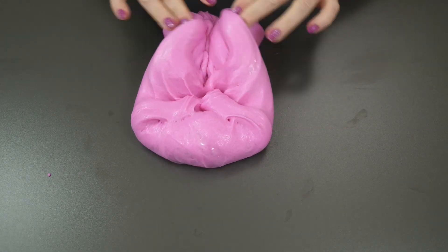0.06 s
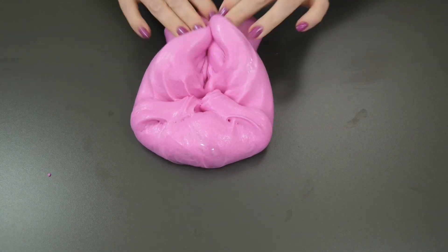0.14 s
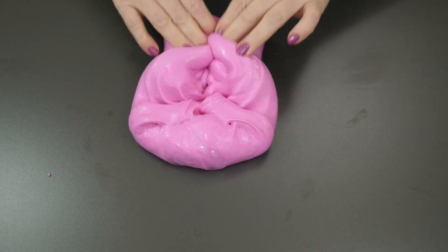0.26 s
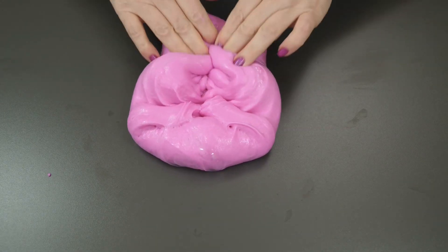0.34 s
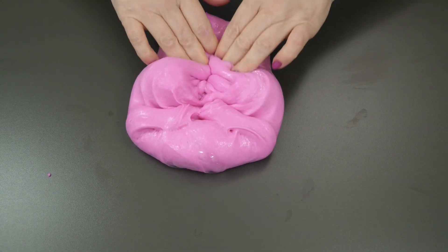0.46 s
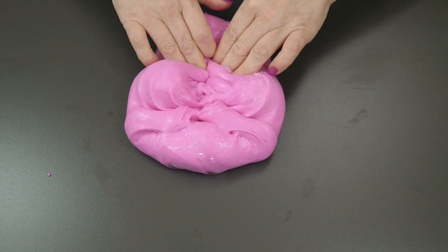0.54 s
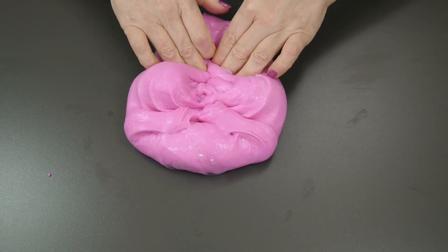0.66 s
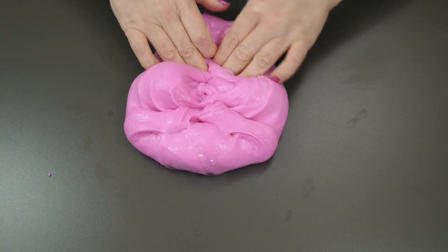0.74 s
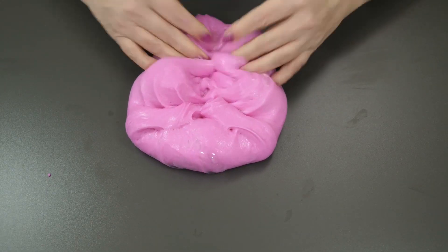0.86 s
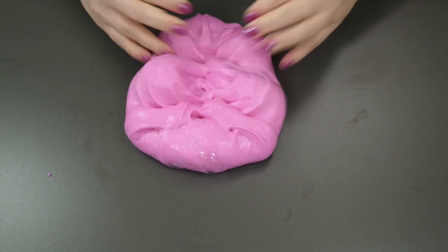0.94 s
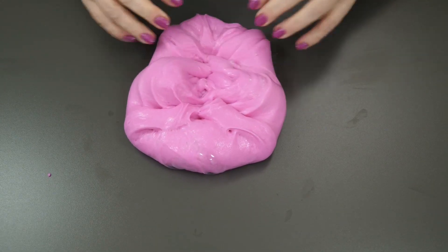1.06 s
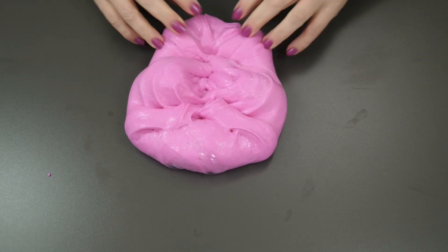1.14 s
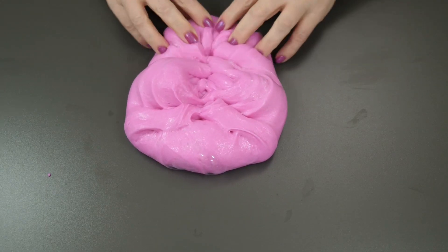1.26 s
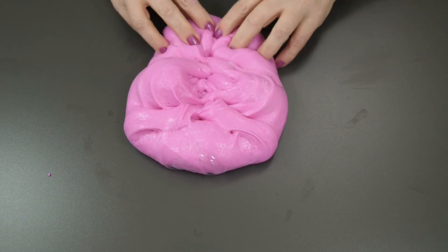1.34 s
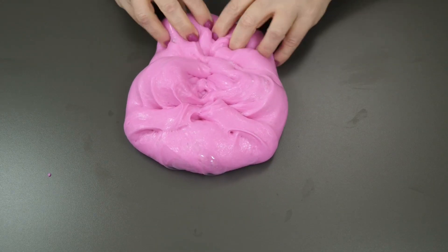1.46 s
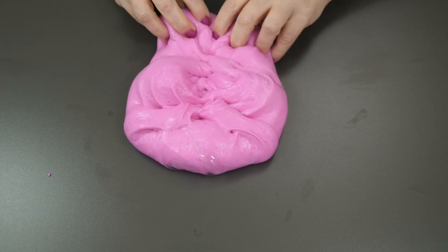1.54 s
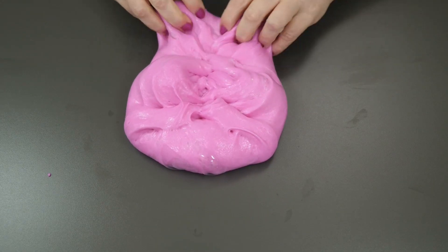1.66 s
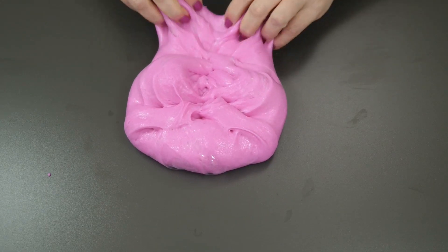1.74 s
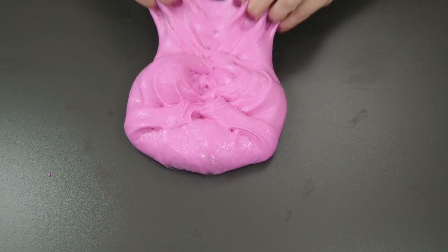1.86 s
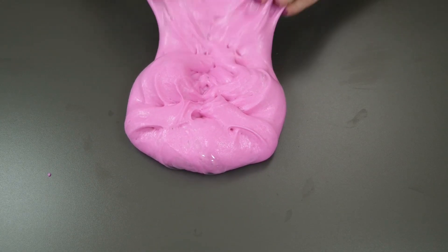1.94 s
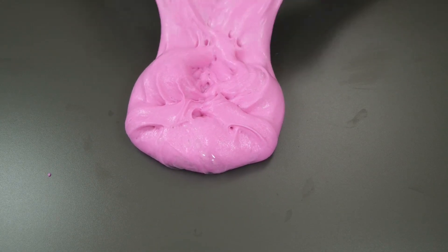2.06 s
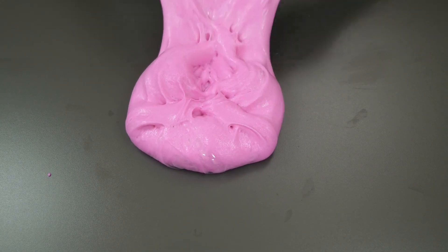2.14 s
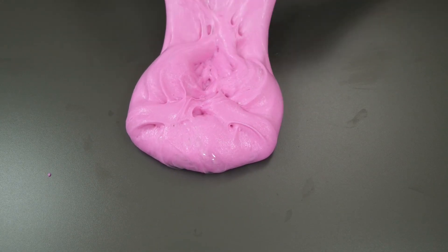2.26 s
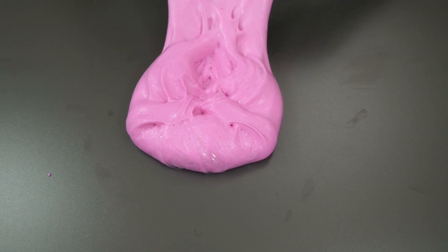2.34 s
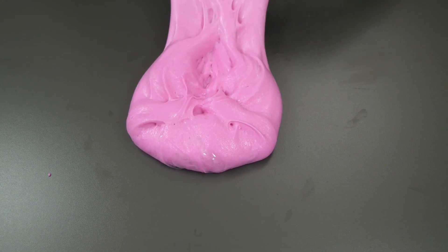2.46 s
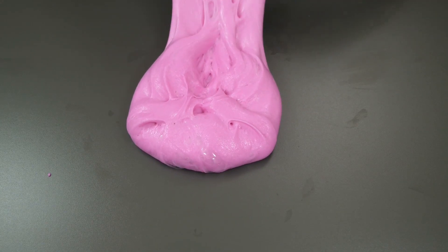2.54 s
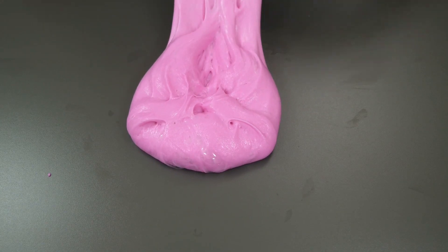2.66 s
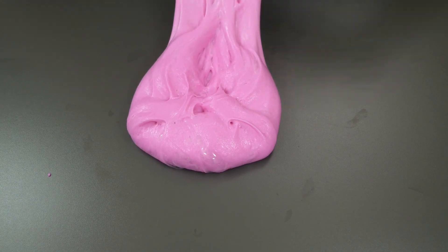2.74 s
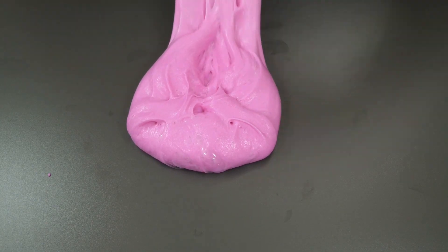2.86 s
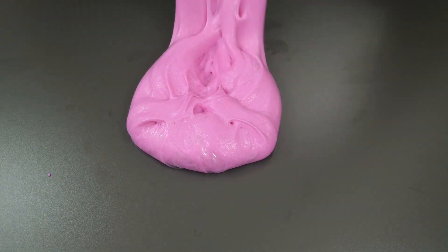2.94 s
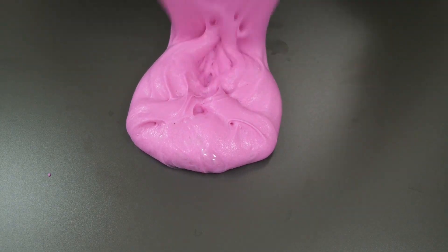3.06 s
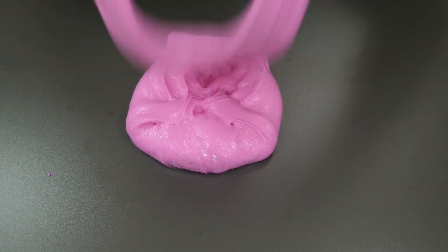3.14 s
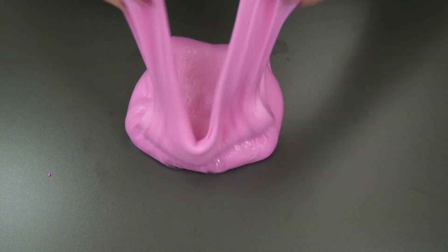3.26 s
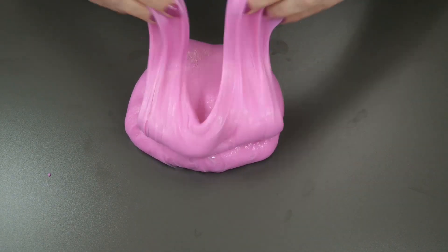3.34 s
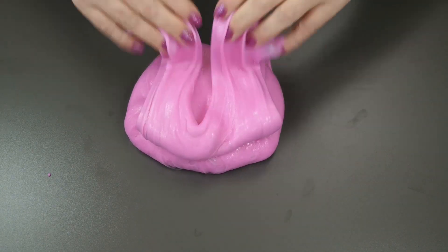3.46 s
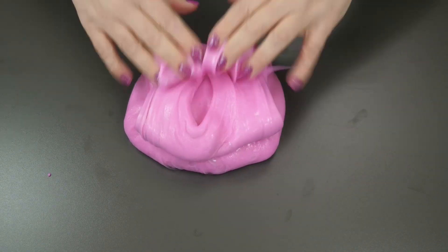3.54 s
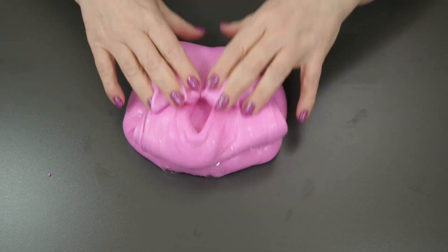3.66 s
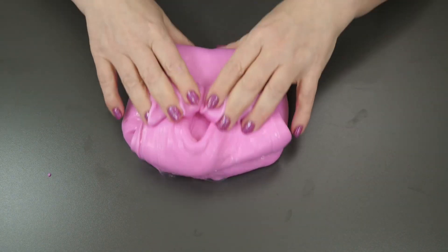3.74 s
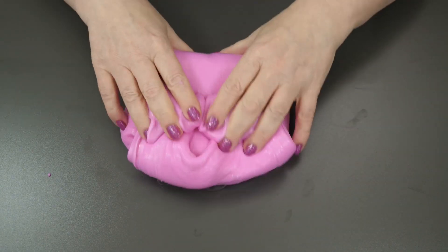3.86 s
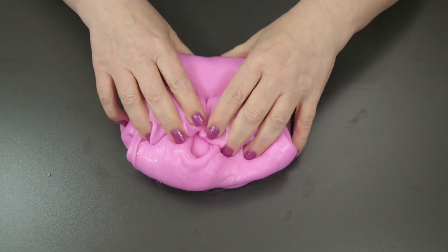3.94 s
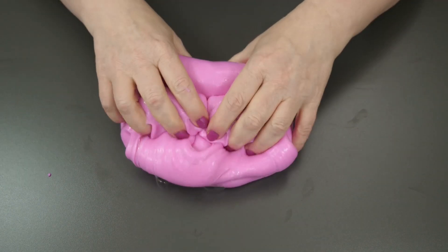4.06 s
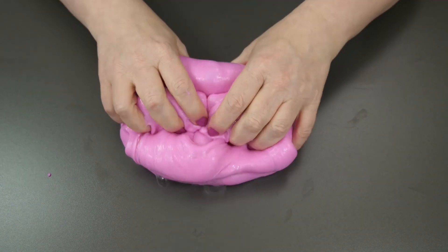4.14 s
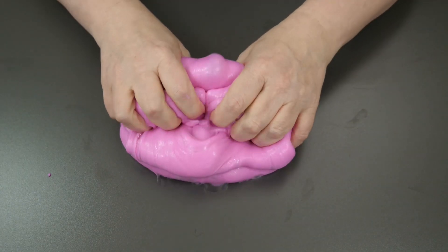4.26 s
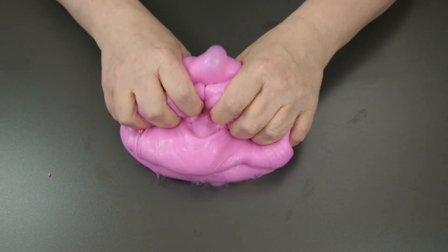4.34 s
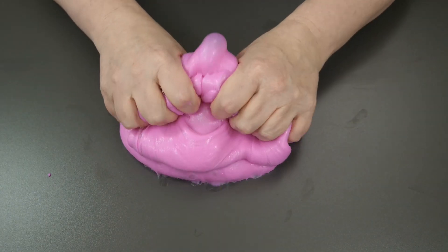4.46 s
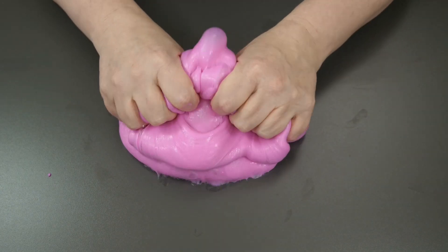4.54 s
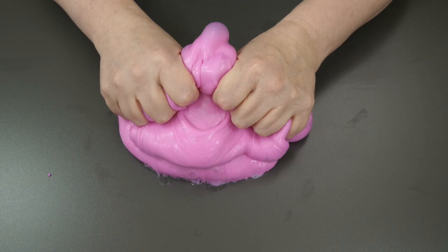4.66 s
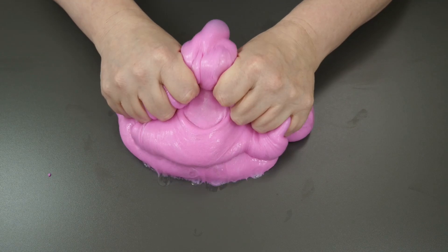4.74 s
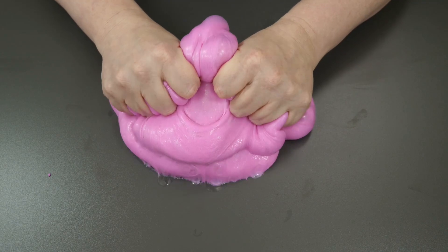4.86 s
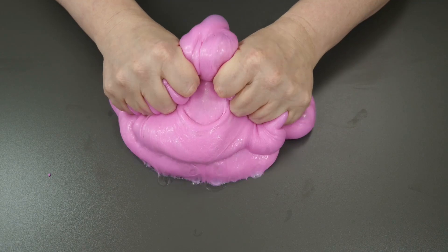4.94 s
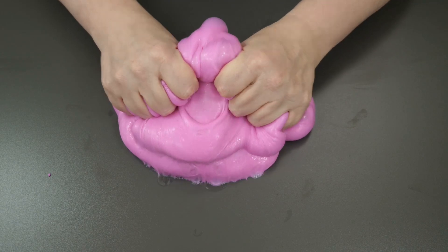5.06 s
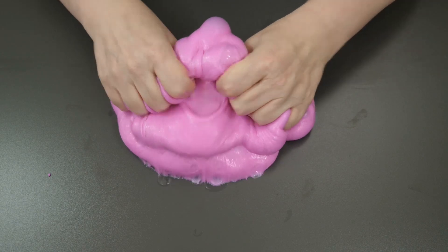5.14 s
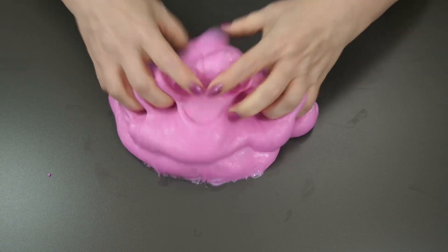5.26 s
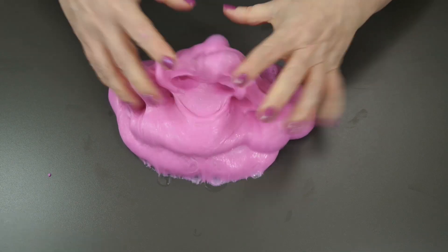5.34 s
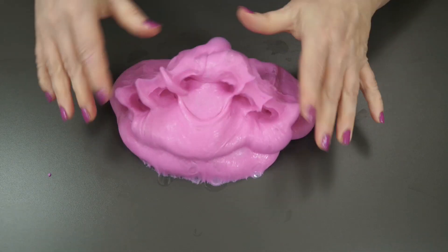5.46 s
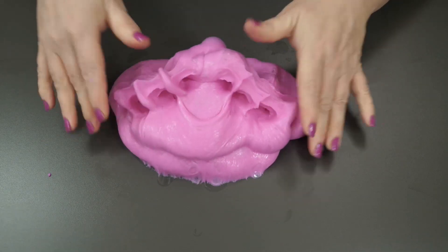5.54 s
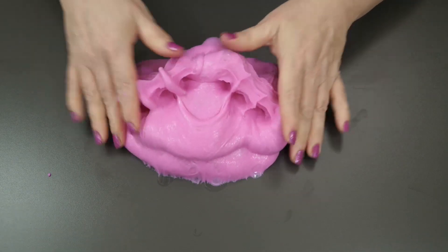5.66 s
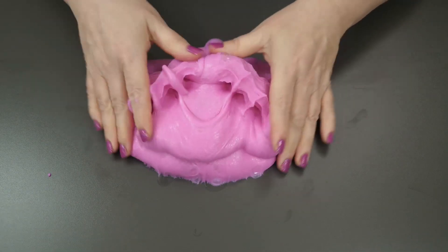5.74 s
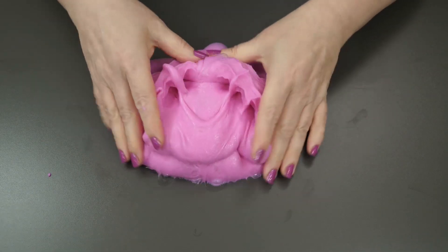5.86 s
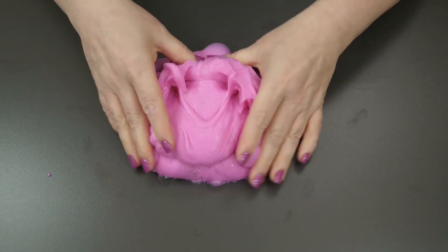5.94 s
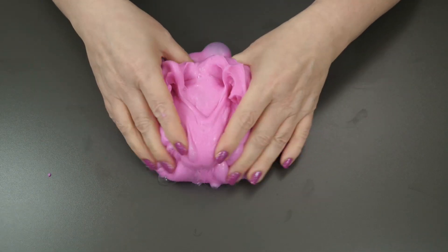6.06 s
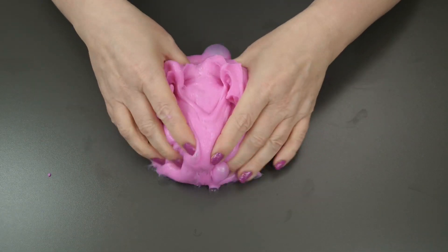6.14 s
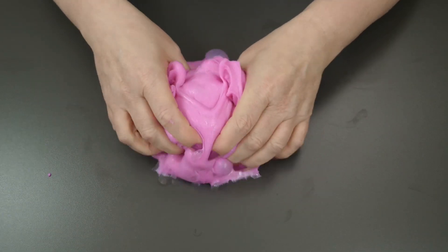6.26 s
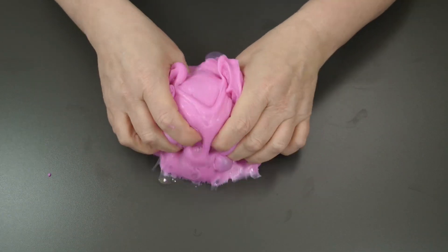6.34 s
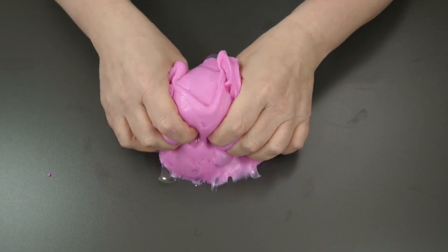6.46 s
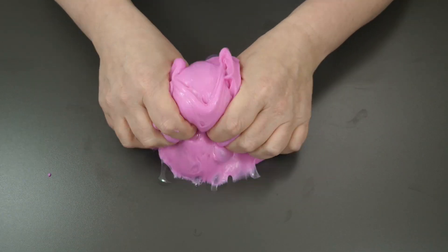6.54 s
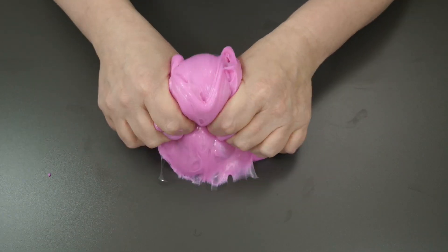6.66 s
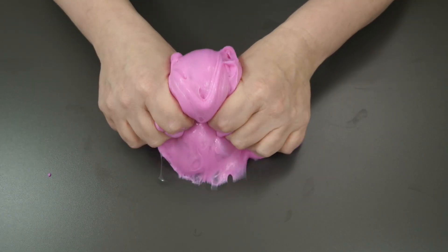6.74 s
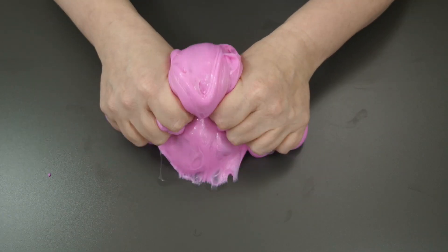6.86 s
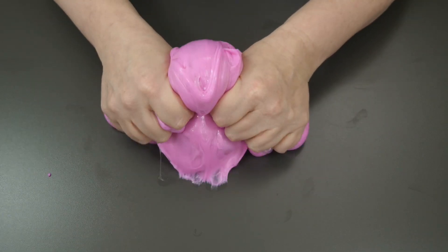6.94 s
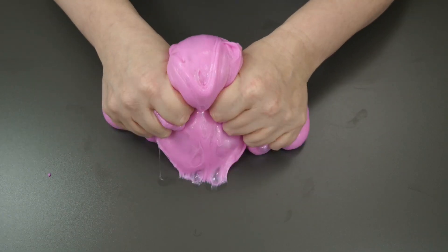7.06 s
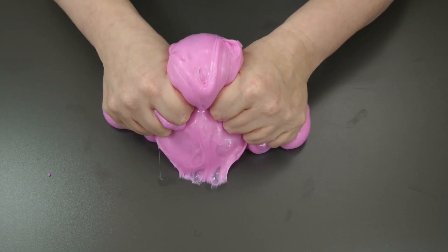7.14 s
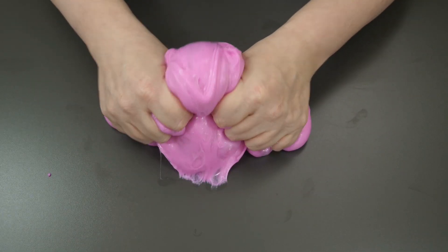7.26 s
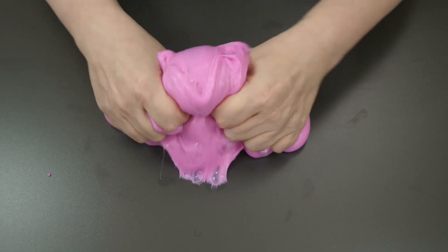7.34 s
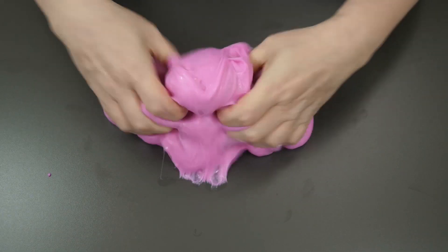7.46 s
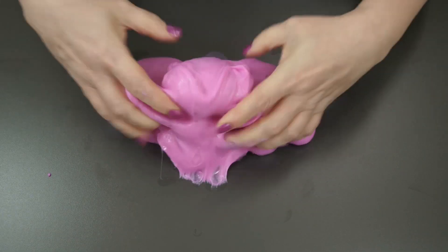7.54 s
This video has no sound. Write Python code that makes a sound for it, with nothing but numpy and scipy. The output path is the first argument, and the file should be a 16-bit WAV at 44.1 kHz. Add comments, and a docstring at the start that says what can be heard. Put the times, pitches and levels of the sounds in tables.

```python
"""At a table in a small room, two hands fold, stretch and squeeze foamy slime near a stereo microphone.
Trapped air bursts out in sharp pops, sticky skin tears off the fingers in dense crackle, and a stretched
strand flops back down. Each pop bounces off the table top and rings briefly in the room; the loudest
ones overload the recorder. Underneath, the table rumbles as the arms shove it."""
import sys
import numpy as np
from scipy import signal
from scipy.fft import rfft, irfft
from scipy.io import wavfile
from scipy.ndimage import uniform_filter1d

SR = 44100
rng = np.random.default_rng(int(sys.argv[2]) if len(sys.argv) > 2 else 0)


def unload_wav(signal):
    """Save mono or channel-first audio to the path in sys.argv[1] as 16-bit WAV at rate SR, clipped to [-1, 1]."""
    wavfile.write(
        sys.argv[1],
        SR,
        np.round(np.clip(np.atleast_2d(signal).T, -1, 1) * 32767).astype(np.int16),
    )


N = 335160
T = np.arange(N) / SR

# Levels in all tables are relative: the functions add their own gains.
# the hands press, stretch or squeeze the lump: start_s, end_s, smear_db, foam_db
PRESSES = [(0.02, 0.105, -47, -48), (0.294, 0.7, -67, -64), (2.1, 3.15, -75, -65),
           (3.521, 4.404, -54.5, -57), (4.6, 4.658, -40.5, -42), (4.849, 5.08, -59, -47.5),
           (5.75, 5.9, -56.5, -64), (5.98, 6.744, -50.5, -51), (6.98, 7.165, -43, -42),
           (7.389, 7.6, -49.5, -43.5)]
# tone of the tiniest breaking threads and foam cells: frequency_hz, level_db
FIZZ_TONE = [(3500, -36), (6500, -5.5), (10500, -1), (13000, -4), (16000, -11)]


def from_db(db):
    """Turn decibels into a gain."""
    return 10 ** (np.asarray(db) / 20)


def unit_power(x):
    """Scale a sound to an average power of 1."""
    return x / np.sqrt(np.mean(x ** 2) + 1e-20)


def at_hz(points, hz):
    """Read between the rows of a table, on a log-frequency axis."""
    frequency, value = np.transpose(points)
    return np.interp(np.log(np.maximum(hz, 1)), np.log(frequency), value)


def tone_filter(tone, size):
    """A click of energy 1 with this tone, which falls away past both ends of the table."""
    hz = np.maximum(np.arange(size // 2 + 1) * SR / size, 1)
    octaves_outside = np.abs(np.log2(hz / np.clip(hz, tone[0][0], tone[-1][0])))
    gain = from_db(at_hz(tone, hz) - 20 * np.minimum(octaves_outside, 2))
    # minimum phase: pack the energy at the start of the click
    cepstrum = irfft(np.log(gain))
    cepstrum[1:size // 2] *= 2
    cepstrum[size // 2 + 1:] = 0
    click = irfft(np.exp(rfft(cepstrum)))
    return click / np.linalg.norm(click)


def colour(x, tone, size=2048):
    """Give both channels this tone."""
    return signal.oaconvolve(x, tone_filter(tone, size)[None], axes=1)[:, :N]


def stereo_noise(alike, size=N):
    """White noise whose left and right are unrelated (alike=0) up to identical (alike=1)."""
    mid, side = rng.standard_normal((2, size))
    return (np.sqrt(1 + alike) * mid + np.sqrt(1 - alike) * side * [[1], [-1]]) / np.sqrt(2)


def add(out, start_s, sound):
    """Mix a short sound in at a given time."""
    i = max(round(start_s * SR), 0)
    out[:, i:i + sound.shape[-1]] += sound[..., :max(N - i, 0)]


def swell(start_s, end_s, rise_s, fall_s):
    """A gain that climbs 20 dB in rise_s, holds from start_s to end_s, then drops 20 dB per fall_s."""
    away = np.maximum(start_s - T, 0) / rise_s + np.maximum(T - end_s, 0) / fall_s
    return np.where(away < 4, from_db(-20 * away), 0)


def strongest(swells, levels_db):
    """One gain curve per column of levels, set by the strongest movement at each moment."""
    out = np.zeros((len(levels_db[0]), N))
    for gain, db in zip(swells, levels_db):
        out = np.maximum(out, from_db(db)[:, None] * gain)
    return out


def room_hush(level_db=-50):
    """The steady hush of the room."""
    # tone of the hush: frequency_hz, level_db
    hush_tone = [(15, -38), (25, -1.5), (61, -1), (123, -11.5), (223, -12), (301, -13), (344, -14.5),
                 (503, -20), (659, -20.5), (1230, -24), (11000, -31), (14800, -30.5), (16000, -36)]
    return from_db(level_db) * colour(stereo_noise(alike=0.053), hush_tone, size=8192)


def table_rumble(resting_db=-51, gain_db=-0.5):
    """The table rumbles under the arms, more when they shove it."""
    # shoves of the arms: peak_s, rise_s, fall_s, level_db
    shoves = [(0.1, .5, .8, -44), (1.02, 0.21, .17, -33), (1.33, 0.19, 0.38, -38.5),
              (3.3, 0.054, 0.19, -32), (5.31, .12, 0.32, -30.5), (5.7, 0.66, .8, -40.5),
              (6.2, 1.3, 0.43, -36.5), (7.55, 0.33, .3, -35)]
    # tone of the shaking table: frequency_hz, level_db
    rumble_tone = [(12, -30.5), (20, 3), (32, 1), (54, 0), (81, -3), (119, -17), (190, -17.5), (250, -49),
                   (420, -120)]
    swells = [swell(s, s, rise, fall) for s, rise, fall, _ in shoves]
    push, = strongest(swells, [row[3:] for row in shoves])
    shake = from_db(gain_db) * np.hypot(push, from_db(resting_db))
    return shake * colour(stereo_noise(alike=0.93), rumble_tone, size=16384)


def room_echo(t, tail_db=-3, build_s=0.0058, near_db=-7, near_s=0.0026, bands=8):
    """The room's answer to a click: quick bounces off nearby things, then a smooth, fading tail."""
    # tone of the tail: frequency_hz, level_db
    tail_tone = [(100, -11), (220, 4), (450, 1), (1200, 0.5), (4000, 1), (6500, -4), (10500, -3),
                 (16000, -10.5)]
    # time the tail takes to fade by 60 dB: frequency_hz, fade_s
    fade_times = [(150, 0.3), (1000, 0.28), (4000, 0.3), (9000, 0.26), (16000, 0.42)]
    # how alike left and right are: frequency_hz, likeness (0 to 1)
    likeness = [(100, 1), (300, 0.52), (800, 0), (2000, 0.024), (6000, 0.5), (16000, 0)]
    hz = np.maximum(np.arange(len(t) // 2 + 1) * SR / len(t), 1)
    centres = np.geomspace(125, 16000, bands)
    near = np.exp(-t / near_s) * (1 - np.exp(-2 * t / near_s))
    near *= from_db(near_db) / np.linalg.norm(near)
    spectrum = 0
    for centre, pick in zip(centres, np.eye(bands)):
        tail = from_db(-60 * t / at_hz(fade_times, centre)) * (1 - np.exp(-t / build_s))
        tail *= from_db(tail_db + at_hz(tail_tone, centre)) / np.linalg.norm(tail)
        band = np.sqrt(np.interp(np.log(hz), np.log(centres), pick))
        noise = stereo_noise(at_hz(likeness, centre), size=len(t))
        spectrum = spectrum + band * rfft((near + tail) * noise)
    fade_out = np.minimum(1, 2 * (1 - t / t[-1]))
    return irfft(spectrum) * fade_out


def table_top(t, echo_s=0.001325, echo_db=-11):
    """The hard top's answer to a click: the click itself, one quick bounce and the table's ringing."""
    # notes the top rings at: pitch_hz, width_hz, level_db
    notes = [(220.6, 14.5, -2), (326.6, 31, -3.5), (590, 19, -10), (936, 58, -11), (1370, 100, -9)]
    answer = np.zeros(len(t))
    for hz, width, db in notes:
        ring = np.exp(-np.pi * width * t) * np.cos(2 * np.pi * hz * t)
        answer += from_db(db) * 2 * np.pi * width / SR * ring
    answer[0] += 1
    answer[round(echo_s * SR)] += from_db(echo_db)
    return answer


def flops(contact_s=0.0025):
    """The soft lump lands and sets the table's low notes ringing."""
    # landings and knocks: start_s, level_db
    landings = [(0.931, -28), (1.005, -28), (3.2751, -24), (4.46, -42), (4.551, -48), (5.319, -34),
                (5.456, -52), (7.477, -40)]
    # the table's low notes: pitch_hz, level_db, fade_s (to fall 60 dB)
    notes = [(39.3, -8.5, 0.5), (81.2, -5, 0.18), (172, -8.5, 0.26), (215.7, -2, 0.18), (312, -9.5, 0.082)]
    t, out = np.arange(SR // 2) / SR, np.zeros((2, N))
    thud = sum(np.sin(2 * np.pi * hz * t) * from_db(db - 60 * t / fade_s) for hz, db, fade_s in notes)
    thud *= 1 - np.exp(-t / contact_s)
    for start_s, db in landings:
        add(out, start_s, from_db(db) * thud)
    return out


def tiny_tears(tone, per_s, spread_db, width_db):
    """Many tiny clicks with this tone, each with a random time, size and side."""
    when, size, sign, side, lag = rng.random((int(per_s * N / SR), 5)).T
    sizes = from_db(spread_db * np.minimum(-np.log(size), 5)) * np.sign(sign - .5)
    pan = from_db(width_db * (2 * side - 1))
    left_at = (when * N).astype(int)
    right_at = np.clip(left_at + (12 * lag - 4).astype(int), 0, N - 1)  # a few samples apart
    clicks = np.array([np.bincount(left_at, sizes * pan, N), np.bincount(right_at, sizes / pan, N)])
    return colour(unit_power(clicks), tone)


def kneading(smear_db=-6.5, foam_db=-4.5, grip_s=0.39, relax_s=0.14):
    """Foam cells break steadily while the lump is stretched or pressed."""
    # tone of smearing slime: frequency_hz, level_db
    smear_tone = [(130, -13), (230, -3.5), (500, -7), (1400, -7.5), (4500, -9), (8000, -17)]
    swells = [swell(start, end, grip_s, relax_s) for start, end, *_ in PRESSES]
    smear_gain, foam_gain = strongest(swells, [row[2:] for row in PRESSES])
    smear = smear_gain * tiny_tears(smear_tone, per_s=1200, spread_db=5.5, width_db=1)
    foam = foam_gain * tiny_tears(FIZZ_TONE, per_s=900, spread_db=1.5, width_db=2.5)
    return from_db(smear_db) * smear + from_db(foam_db) * foam


def peeling(squelch_db=-6, crackle_db=-3, fizz_db=-3):
    """Sticky threads let go of the skin by the thousand; big ones squelch, small ones fizz."""
    # patches peeling off the skin: let_go_s, rise_s, fall_s, squelch_db, crackle_db, fizz_db
    peels = [(0.874, 0.014, 0.023, -23.5, -36, -37), (0.924, 0.017, 0.035, -23, -20, -28),
             (0.975, 0.11, 0.061, -38, -51, -32.5), (1.43, 0.17, 0.19, -54, -47.5, -49.5),
             (1.526, 0.11, 0.15, -45.5, -49, -48), (1.73, 0.11, .13, -55, -49, -47.5),
             (1.876, 0.2, 0.26, -46, -46, -43.5), (5.215, .02, 0.046, -21.5, -20, -19.5),
             (5.245, .11, 0.19, -29, -30.5, -29.5), (5.35, 0.34, 0.065, -32.5, -37.5, -34),
             (5.414, 0.19, 0.038, -37.5, -38.5, -34), (7.446, 0.031, 0.036, -24, -23.5, -20.5),
             (7.478, 0.029, 0.032, -19.5, -23.5, -26), (7.55, 0.19, 0.55, -30.5, -34, -34.5)]
    # tones of big and of middle-sized threads: frequency_hz, level_db
    squelch_tone = [(110, -16.5), (200, 3.5), (330, 1), (450, -2), (800, -3.5), (1200, -3), (2000, -34)]
    crackle_tone = [(700, -6), (1400, -2.5), (2400, -2.5), (4300, -2.5), (6000, -10), (9000, -14.5)]
    swells = [swell(s, s, rise, fall) for s, rise, fall, *_ in peels]
    squelch_gain, crackle_gain, fizz_gain = strongest(swells, [row[3:] for row in peels])
    squelch = squelch_gain * tiny_tears(squelch_tone, per_s=1200, spread_db=2.5, width_db=2.5)
    crackle = crackle_gain * tiny_tears(crackle_tone, per_s=3000, spread_db=2.5, width_db=2.5)
    fizz = fizz_gain * tiny_tears(FIZZ_TONE, per_s=5000, spread_db=3.5, width_db=12)
    return from_db(squelch_db) * squelch + from_db(crackle_db) * crackle + from_db(fizz_db) * fizz


def bubbles(ring_cycles=16, rise_per_s=1.5, gain_db=-1):
    """A closed air pocket rings for a few cycles, so big ones last longer; squeezing lifts its pitch."""
    # hollow rings inside the lump: start_s, level_db, start_pitch_hz
    pockets = [(0.033, -42, 820), (0.092, -43, 960), (0.871, -27, 234), (0.929, -12, 1460),
               (0.931, -15, 944), (0.932, -21.5, 192), (2.796, -37, 1940), (2.805, -45, 297),
               (3.19, -46, 1400), (3.277, -29, 345), (3.278, -27, 480), (3.4583, -41, 1330),
               (3.686, -48, 290), (4.003, -36, 670), (4.11, -42, 270), (4.186, -41, 732), (4.25, -43, 230),
               (4.457, -17.5, 572), (4.458, -22.5, 312), (4.553, -27, 214), (5.205, -26, 184),
               (5.974, -23, 1320), (6.397, -31, 295), (7.032, -25.5, 600), (7.45, -19, 324),
               (7.476, -20, 281)]
    t, out = np.arange(SR // 10) / SR, np.zeros((2, N))
    for start_s, db, hz in pockets:
        ring = np.sin(2 * np.pi * hz * t * (1 + rise_per_s * t))
        add(out, start_s, ring * from_db(db + gain_db - 60 * t * hz / ring_cycles))
    return out


def squirts(fade_s=0.038, width_hz=1600, gain_db=-1):
    """A brief jet of air hisses, roughly tuned by the slit it escapes through."""
    # jets of air: start_s, level_db, pitch_hz
    jets = [(0.925, -24, 2680), (3.276, -40, 2360), (4.552, -13.5, 4200), (4.844, -21, 4100),
            (5.222, -25, 3880), (6.398, -24.5, 3760), (7.474, -24, 4100)]
    t, out = np.arange(SR // 10) / SR, np.zeros((2, N))
    for start_s, db, hz in jets:
        slit = signal.butter(2, [hz - width_hz / 2, hz + width_hz / 2], "band", fs=SR, output="sos")
        hiss = unit_power(signal.sosfilt(slit, stereo_noise(alike=0.96, size=len(t))))
        add(out, start_s, hiss * from_db(db + gain_db - 60 * t / fade_s))
    return out


def rip(t, decay_s, tone):
    """A short ragged burst of noise, evened out across frequency and then given a tone."""
    burst = rfft(rng.standard_normal(len(t)) * np.exp(-t / decay_s))
    evened = burst / np.abs(burst) ** .75
    return irfft(evened * rfft(tone_filter(tone, len(t))))


def stray_pop_rows(per_s=14, spread_db=2.5, pitch_hz=3900, most_per_press=40):
    """Rows for pops(): small random pops during a press, louder the harder it foams."""
    rows = []
    for start_s, end_s, _, foam_db in PRESSES:
        times = start_s + np.cumsum(rng.exponential(1 / per_s, most_per_press))
        for s, (size, ring, pitch, side) in zip(times, rng.standard_normal((most_per_press, 4))):
            if s < end_s:
                db = foam_db + spread_db * size
                snap_db, ring_db, puff_db = db + 9.5, db - 3.5 + spread_db * ring, db - 5.5
                rows.append((s, snap_db, pitch_hz * 2 ** (pitch / 4), ring_db, puff_db, 2 * side))
    return rows


def pops(rows, snap_s=0.00014, puff_s=0.0011, snap_gain_db=2.5, ring_gain_db=-2):
    """An air pocket's thin skin snaps, the opened hollow rings a cycle or two and its air puffs out."""
    # tones of the snapping skin and of the puff of air: frequency_hz, level_db
    snap_tone = [(2500, -18), (6000, -16.5), (8000, -7), (10700, -3), (13000, -5), (16000, -10.5)]
    puff_tone = [(90, -12.5), (210, 2.5), (600, -1), (1000, -1.5), (1500, -7), (2400, -9.5), (5000, -4.5)]
    t, out = np.arange(1024) / SR, np.zeros((2, N))
    hz = np.arange(len(t) // 2 + 1) * SR / len(t)
    level_span_s, margin_s = .0016, .002  # levels count as if each part lasted level_span_s
    for start_s, snap_db, pitch_hz, ring_db, puff_db, pan_db in rows:
        snap = rip(t, snap_s, snap_tone)
        ring = np.sin(2 * np.pi * pitch_hz * t) * np.exp(-t * pitch_hz)
        puff = rip(t, puff_s, puff_tone)
        gains = from_db([snap_db + snap_gain_db, ring_db + ring_gain_db, puff_db])
        pop = sum(gain * part / np.linalg.norm(part) for gain, part in zip(gains, (snap, ring, puff)))
        pop *= np.sqrt(level_span_s * SR)
        # each pocket lies at its own distance from the two microphones
        delays_s = margin_s + np.array([[-.5], [.5]]) * rng.normal(.00004, .00006)
        pair = irfft(rfft(pop) * np.exp(-2j * np.pi * hz * delays_s))
        add(out, start_s - margin_s, pair * from_db([[pan_db / 2], [-pan_db / 2]]))
    return out


def scene(spot_count=7, wander_s=.006):
    """Sounds come from several spots on the lump, and each spot has its own room echo."""
    # air pockets bursting: start_s, snap_db, pitch_hz, ring_db, puff_db, left_over_right_db
    main_pops = [(0.0262, -39.5, 3800, -45, -65, 2), (0.3949, -39, 2980, -70, -56, 0),
                 (0.4751, -43, 4430, -46, -49, -1), (0.5023, -37.5, 3900, -44, -61, -2),
                 (0.6111, -48, 2720, -42, -49, -1), (0.8706, -30, 2500, -58, -30, 1),
                 (0.8871, -37, 3200, -32, -30, -5), (0.9247, -34, 2780, -13.5, -29, 0),
                 (0.9291, -37, 1690, -26, -45, -2), (1.431, -41.5, 4100, -48, -44, -5),
                 (1.7223, -38, 3400, -47, -41, -2), (1.7487, -39.5, 3300, -58, -60, 3),
                 (2.283, -48, 4000, -72, -63, 1), (3.2708, -42, 2400, -31, -32, 7),
                 (3.2763, -29, 2490, -27, -25, -2.5), (3.6854, -62, 2600, -42, -44, 0),
                 (3.7302, -48, 2900, -48, -45, 0), (3.7816, -35.5, 3300, -43, -52, -4),
                 (3.8209, -44, 3650, -35, -45, 1.5), (3.931, -28, 2450, -42.5, -40, 1.5),
                 (4.0024, -41, 3500, -37.5, -38.5, 1), (4.1732, -38, 4800, -63, -47, -3),
                 (4.2227, -40.5, 4070, -46, -40.5, 1), (4.4558, -8.5, 2640, -18.5, -19, 1.5),
                 (4.4693, -18, 3300, -27, -27, -7), (4.5454, -11.5, 6350, -11, -44, -5),
                 (4.5513, -9.5, 4430, -3.5, -31, 1.5), (4.6762, -30, 4330, -29, -60, 0),
                 (4.6893, -30, 4300, -32, -59, 1), (4.7112, -13.5, 4500, -37, -48, 1),
                 (4.7685, -24, 4500, -27.5, -38, 0), (4.8366, -29, 2500, -42, -32.5, 7),
                 (4.8441, -22, 4300, -16.5, -40, -4), (4.8727, -8.5, 4350, -25, -33, 2.5),
                 (4.894, -22, 5000, -35, -63, -8), (4.916, -22.5, 4500, -34, -50, -1),
                 (4.9299, -24, 5100, -35, -64, -4), (4.9354, -22, 5100, -35, -64, 0),
                 (4.9727, -23.5, 4400, -43, -48, 2), (5.2128, -16.5, 2760, -21, -28, 1),
                 (5.2247, -27, 3750, -17, -31, 2), (6.1408, -36, 4500, -68, -60, 3),
                 (6.195, -26.5, 4470, -33, -52, 1), (6.2392, -41, 4500, -50, -59, 3),
                 (6.3644, -32, 3900, -51, -47, 0), (6.3978, -28.5, 4740, -17.5, -29.5, -2),
                 (6.5417, -31, 3160, -26.5, -32, -0.5), (6.5693, -29, 4800, -36, -44, 0),
                 (6.5792, -25.5, 4500, -53, -53, -2), (6.6373, -26.5, 4325, -32.5, -48, 1),
                 (6.7758, -28, 4100, -52, -63, -1), (6.8034, -14, 3870, -21, -51, -2),
                 (6.8235, -3.5, 4300, -12, -27, -1), (6.8401, -13.5, 4530, -15, -36, 2),
                 (6.9065, -23, 5050, -29.5, -58, -2), (6.9382, -19.5, 5100, -22, -58, -1.5),
                 (6.9577, -25.5, 4900, -38, -61, 0), (6.992, -14, 4800, -40, -42, -2.5),
                 (7.0109, -22, 5900, -25, -49, 3), (7.0315, -3, 4460, -8, -28.5, 1),
                 (7.0666, -12.5, 4800, -14.5, -37, -2), (7.1317, -18.5, 4900, -49, -51, -1),
                 (7.1445, -21, 4500, -50, -57, 0), (7.1569, -14, 5300, -28, -48, -0.5),
                 (7.173, -20, 2520, -26, -46, -1), (7.3132, -43, 2280, -40.5, -65, 1),
                 (7.4418, -47, 5500, -20, -41, 2), (7.4471, -36, 2080, -15, -23, 2.5),
                 (7.4756, -16.5, 4260, -21, -20, 0)]
    bursts = main_pops + stray_pop_rows()
    spots = [pops(bursts[k::spot_count]) for k in range(spot_count)]
    spots[2] += bubbles() + squirts()
    crackle = peeling() + kneading()
    # the crackle jumps to a random spot every wander_s
    crackle_spot = rng.integers(0, spot_count, N)[(T / wander_s).astype(int)]
    t = np.arange(16384) / SR
    top = table_top(t)
    slime = 0
    for k, sound in enumerate(spots):
        share = uniform_filter1d((crackle_spot == k).astype(float), size=128)
        path = top + signal.fftconvolve(room_echo(t), top[None], axes=1)[:, :len(t)]
        slime = slime + signal.oaconvolve(sound + share * crackle, path, axes=1)[:, :N]
    mix = slime + flops() + table_rumble() + room_hush()
    return mix * from_db([[0.5], [-0.5]])  # a little louder on the left


def record(dry, cutoff_hz=16000):
    """The recorder clips the loudest pops and cuts the highest treble."""
    low_pass = signal.ellip(12, .1, 90, cutoff_hz, fs=SR, output="sos")
    return signal.sosfilt(low_pass, np.clip(dry, -1, 1))


dry = scene()
out = record(dry)
unload_wav(out)
```